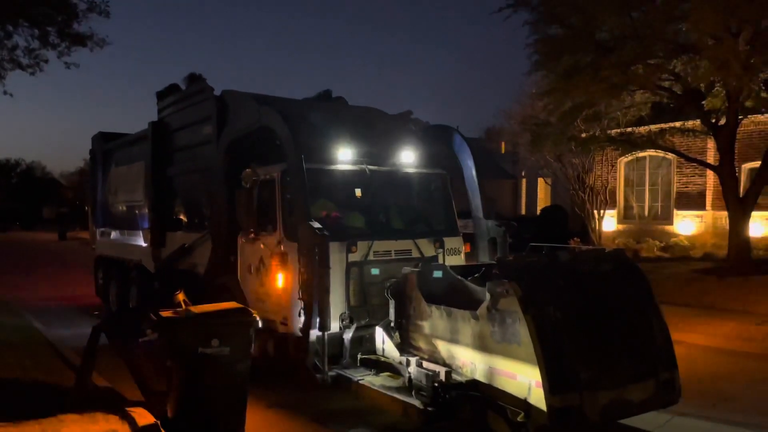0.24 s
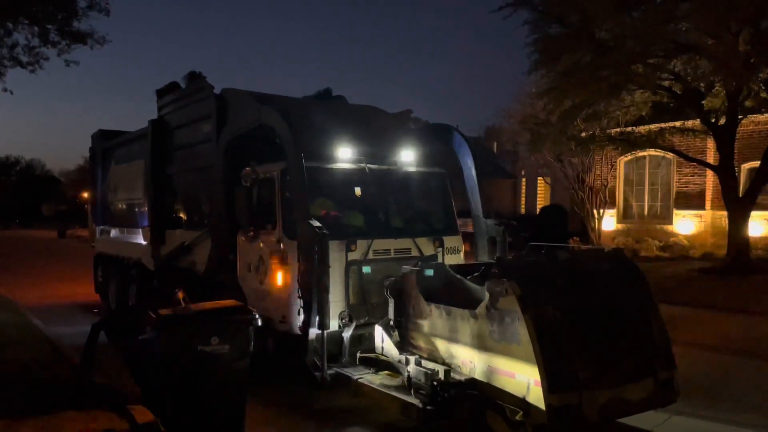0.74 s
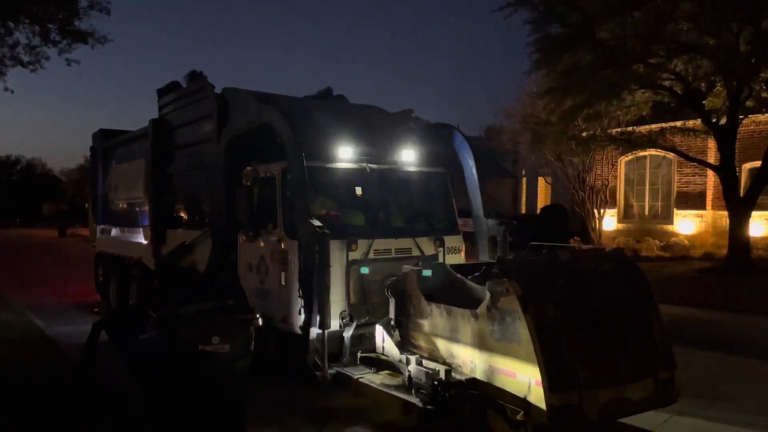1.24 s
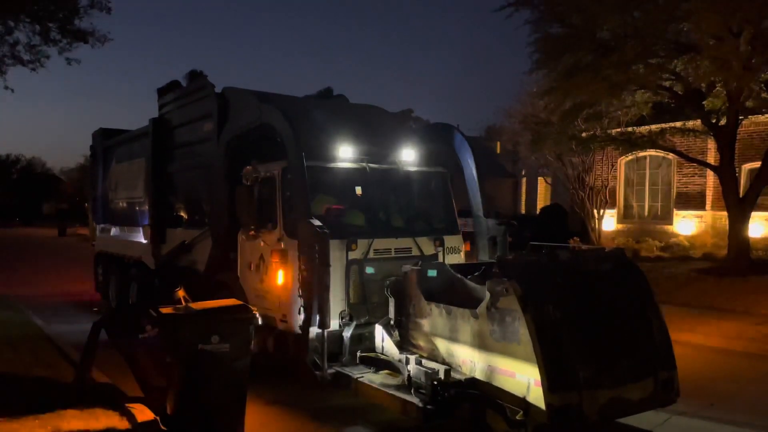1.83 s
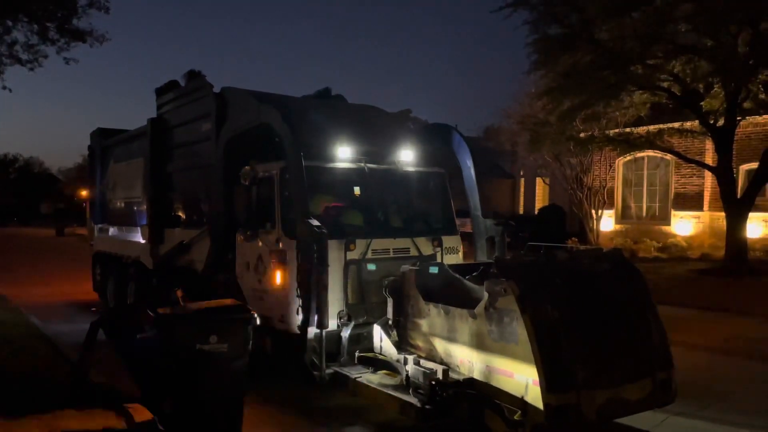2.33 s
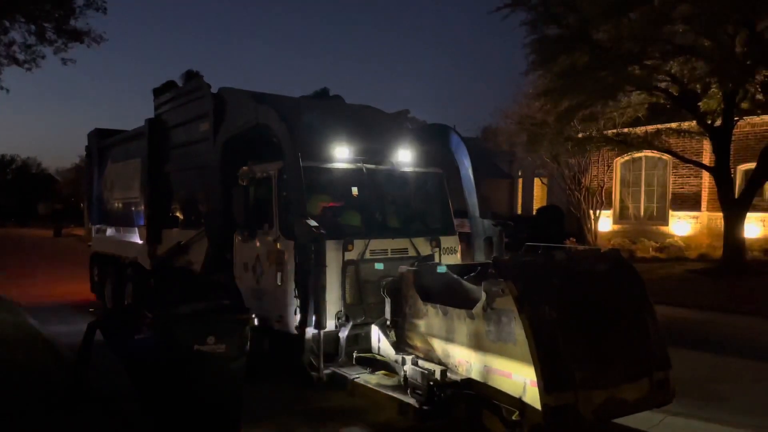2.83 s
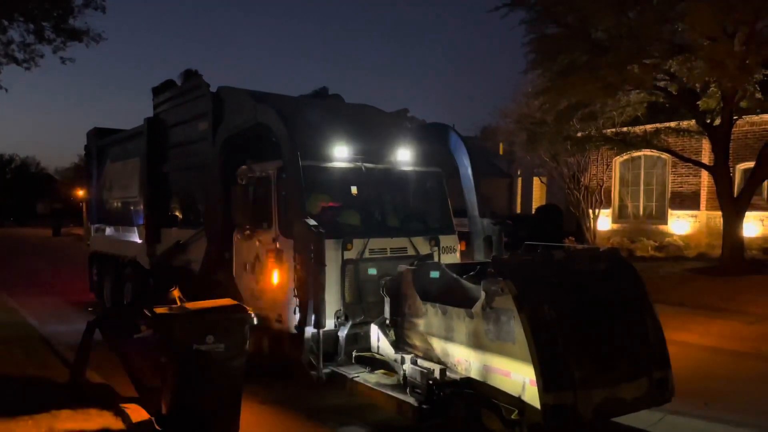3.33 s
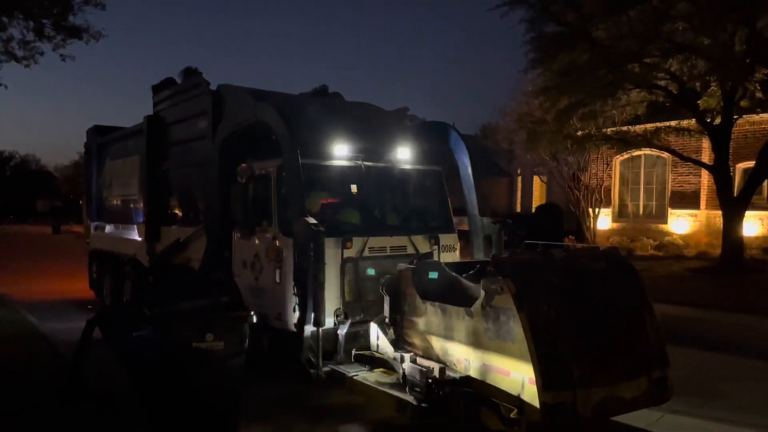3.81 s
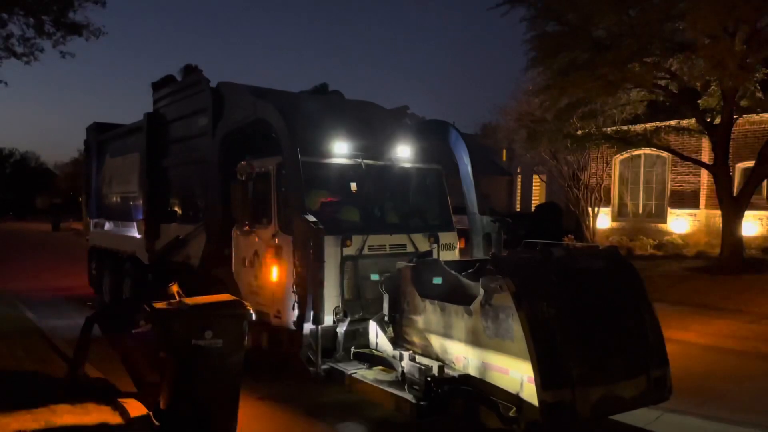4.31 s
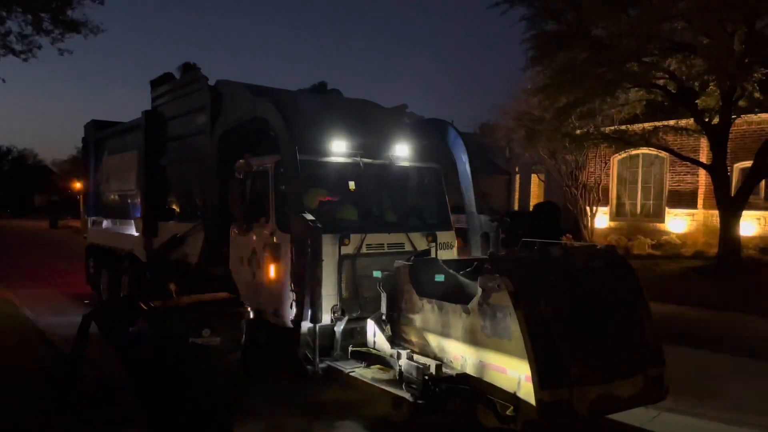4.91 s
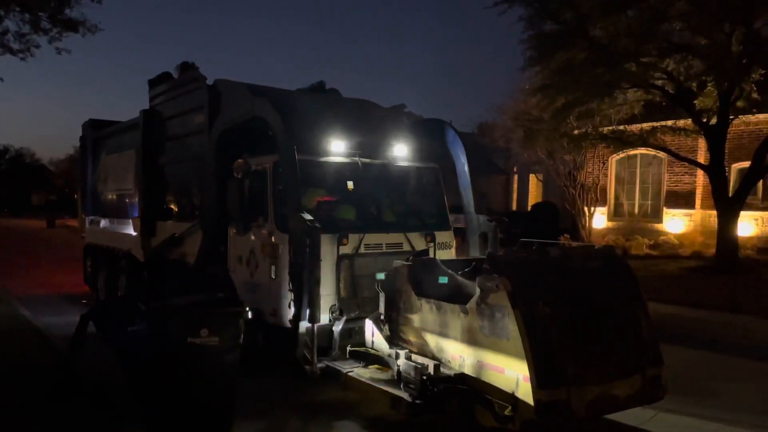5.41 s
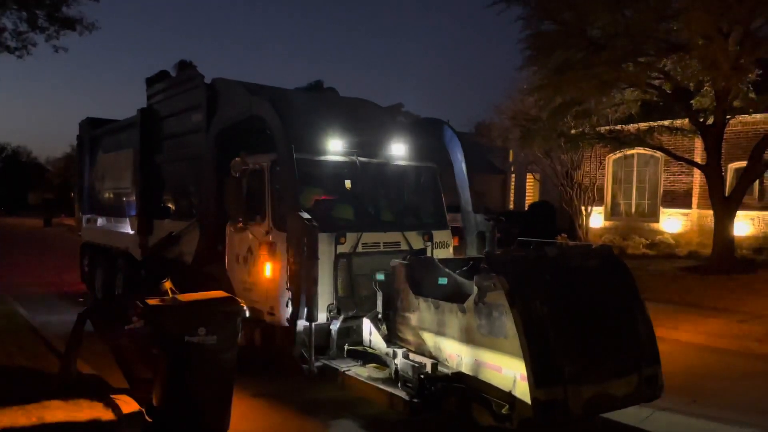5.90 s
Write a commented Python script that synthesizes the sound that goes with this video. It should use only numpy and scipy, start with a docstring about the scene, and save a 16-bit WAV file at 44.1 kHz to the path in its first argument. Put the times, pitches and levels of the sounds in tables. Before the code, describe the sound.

Outdoors on a quiet street, a phone close to a garbage truck hears its diesel throbbing and knocking at fast idle, with pump, gear and alternator whines. A hydraulic valve starts hissing near one second. Soon after, the cooling fan clutch grabs with a low rumble; the engine sags, and the fan swoops up to a loud, droning, rushing roar that continues to the end.

```python
"""A garbage truck's six-cylinder diesel stands at fast idle: firing tones throb, and knocks shape coloured noise.
A pump, gears and an alternator whine as tones tied to the engine speed. At 0.9 s a valve opens: hissing noise.
At 1.7 s the clutch of the cooling fan grabs, a rumble shakes the frame and the engine sags under the load.
The fan swoops up, drones as a tone and roars as noise to the end, while sheet metal rings round it.
A phone hears it all in stereo."""
import sys
import numpy as np
from scipy import signal
from scipy.fft import rfft, irfft
from scipy.io import wavfile
from scipy.ndimage import map_coordinates

SR = 44100
rng = np.random.default_rng(int(sys.argv[2]) if len(sys.argv) > 2 else 0)


def digitize_waveform(pressure):
    """Quantize a signal to 16-bit integers and store it at the path in sys.argv[1].

    Rows of a 2-D input are taken as channels; values are limited to [-1, 1].
    """
    field = np.atleast_2d(pressure).T
    bounded = np.clip(field, -1, 1)
    quanta = np.round(bounded * 32767).astype(np.int16)
    wavfile.write(sys.argv[1], SR, quanta)


N = 271215  # length in samples
IDLE_HZ = 67.5  # firings per second at fast idle


def undb(db):
    """Turn decibels into gain."""
    return 10 ** (np.asarray(db) / 20)


def left_right(pan_db):
    """Share a level difference (left minus right, dB) between the two channels, as dB."""
    return np.array([[pan_db], [-pan_db]]) / 2


def curve(table):
    """Join the (seconds, value) rows of a table by straight lines, at every sample."""
    return np.interp(np.arange(N) / SR, *np.transpose(table))


def spectrum(points):
    """Join (Hz, value) rows on a log-frequency axis, at every frequency bin."""
    hz, value = np.transpose(points)
    bin_hz = np.arange(N // 2 + 1) * SR / N
    return np.interp(np.log(bin_hz + 1), np.log(hz), value)


def walk(rate):
    """Wander slowly and smoothly by chance, with a spread of about 1; rate is fresh levels per second."""
    fresh = rng.standard_normal(int(rate * N / SR) + 3)
    levels = signal.resample_poly(fresh, 4, 1)
    return np.interp(np.arange(N) * 4 * rate / SR, np.arange(len(levels)), levels)


def noise():
    """Make two unrelated white noises."""
    return rng.standard_normal((2, N))


def since(start_s):
    """Seconds passed since a moment, zero before it."""
    return np.maximum(np.arange(N) / SR - start_s, 0)


def resonance(white, hz, width_hz):
    """Ring a white noise in one resonance and bring it to an rms of 1."""
    edges_hz = [hz - width_hz / 2, hz + width_hz / 2]
    rung = signal.sosfilt(signal.butter(2, edges_hz, "band", fs=SR, output="sos"), white)
    return rung / rung.std()


def radiate(pair, colour):
    """Colour two white signals and spread them over the phone's two ports: alike in the bass, unevenly above."""
    # How alike the ports hear the sound. Each row: frequency in Hz, likeness from 0 to 1.
    likeness = [(60, .99), (200, .99), (420, .93), (520, .65), (720, .93), (950, .85), (1180, .25),
                (1350, .78), (1600, .2), (1900, .3), (2080, .7), (2330, .2), (2500, .5), (2800, .4),
                (3250, .72), (4200, .3), (6000, .15), (8500, .25), (10000, .6), (13000, .9)]
    # Which port is louder. Each row: frequency in Hz, left minus right in dB.
    balance_db = [(250, 1.3), (420, -1), (570, 11), (820, 1), (1000, 2), (1270, 12), (1700, 1),
                  (2300, -5.5), (2750, 3), (3600, 7), (5200, 0), (6000, 12), (8100, 5.5), (9000, 0.2)]
    # The two ports hear each frequency at a different phase.
    # Each row: frequency in Hz, lead of the left in radians.
    port_phase = [(60, .05), (200, .22), (400, .75), (520, 1.3), (620, .1), (820, .3), (1000, 1.6),
                  (1250, 5), (1500, 7), (1700, 9.4), (2050, 12.3), (2550, 12.1), (3000, 14.2), (3500, 15.2),
                  (4400, 13.6), (5500, 12.5), (7200, 12.5), (9300, 9.4), (12500, 6.3)]
    # Treble response of the ports. Each row: frequency in Hz, level in dB.
    port_colour = [(4800, -0.5), (5600, -2.5), (5950, 6.5), (6700, 3.5), (7400, -5.5), (8400, 2),
                   (9400, -6), (10500, 2.5), (12500, 1.5), (13500, -7.5), (15500, -13)]
    alike = np.clip(spectrum(likeness), -1, 1)
    mid, side = rfft(pair) * np.sqrt(np.array([1 + alike, 1 - alike]) / 2)
    lean = undb(spectrum(balance_db))
    late = np.exp(-1j * spectrum(port_phase))
    ports = np.array([(mid + side) * lean, (mid - side) * late])
    ports = ports * np.sqrt(2 / (1 + lean ** 2))  # the lean leaves the total power as it was
    gain = undb(spectrum(colour) + spectrum(port_colour))
    return irfft(ports * gain * np.sqrt(SR / 2), N)  # colour is in dB per Hz


def panel_ring(tone_hz):
    """Decibels that ringing panels add to a tone as it nears their resonances."""
    # Panels. Each row: resonance in Hz, width in Hz, boost at the resonance in dB.
    panels = [(252, 22, 8), (941, 32, 13), (1522, 48, 10.5), (1795, 70, 7)]
    return sum(db / (1 + (2 * (tone_hz - hz) / width_hz) ** 2) for hz, width_hz, db in panels)


def exhaust(firings, firing_hz, fan_load, waver_db=0.9):
    """The firing boom and its overtones; a neighbour a sixth higher makes it throb once every engine cycle."""
    # Exhaust note. Each row: multiple of the firing rate, level in dB before the drive below is added.
    exhaust_orders = [(1, 0), (7 / 6, -8), (9 / 6, -21), (10 / 6, -16), (2, -7.5), (14 / 6, -23),
                      (15 / 6, -21), (3, -19), (25 / 6, -22), (31 / 6, -20)]
    # Drive of the boom as it swells and dips. Each row: time in seconds, level in dB.
    boom_table = [(0, -27), (.6, -30.5), (1.1, -27.5), (1.45, -22.5), (1.6, -23.5), (1.72, -29.5),
                  (1.9, -25), (1.98, -31), (2.22, -33), (2.35, -27), (2.65, -22), (3.4, -23.5),
                  (3.8, -25.5), (4.5, -24), (4.9, -25), (5.4, -23.5), (6.15, -23.5)]
    # The throb: level at idle, change as speed rises (fades out under the fan), change at full fan load.
    lope_idle_db, lope_db_per_hz, lope_load_db = -31.5, -4, -4
    overtone_db = -31.5
    boom_db = curve(boom_table)
    above_idle_hz = firing_hz - IDLE_HZ
    lope_db = lope_idle_db + lope_db_per_hz * above_idle_hz * (1 - fan_load) + lope_load_db * fan_load
    out = 0
    for order, db in exhaust_orders:
        if order == 1:
            drive_db = boom_db
        elif order % 1:  # tones between whole multiples come from unequal cylinders
            drive_db = lope_db
        else:
            drive_db = overtone_db
        tone = np.cos(2 * np.pi * order * firings)
        out = out + tone * undb(db + drive_db + waver_db * walk(9))
    return np.sqrt(2) * out


def clatter(firings, firing_hz, fan_load, speed_db_per_hz=0.5, lug_db_per_hz=1.0, repeat=0.62,
            repeat_top_hz=1900, knock_depth=0.18, knock_decay=0.37, waver_db=0.5):
    """Each cylinder knocks in its own way, cycle after cycle; the treble of each knock is new."""
    # Clatter of the engine block, before wavering. Each row: frequency in Hz, level at idle speed in dB per Hz.
    block = [(25, -54), (50, -56.5), (120, -56.5), (180, -62.5), (300, -58), (430, -64.5), (620, -62),
             (740, -59.5), (950, -58.5), (1130, -64.5), (1400, -62.5), (1550, -63.5), (1680, -68.5),
             (2050, -67.5), (2500, -73.5), (3200, -70), (5300, -84.5), (12500, -93.5)]
    # Knock of each cylinder in firing order, in dB.
    cylinder_db = [6, 4, 2.5, -8, 1, -2]
    # One random pattern per channel, read again every six firings.
    size = 4096
    place = firings / 6 % 1 * size
    patterns = rng.standard_normal((2, size))
    cycle = np.array([map_coordinates(p, [place], order=3, mode="grid-wrap") for p in patterns])
    # The repeating share of the power shrinks towards the treble, and fresh noise fills the rest.
    bin_hz = np.arange(N // 2 + 1) * SR / N
    share = np.clip(repeat, 0, 1) / (1 + (bin_hz / repeat_top_hz) ** 4)
    grit = irfft(rfft(cycle) * np.sqrt(share) + rfft(noise()) * np.sqrt(1 - share), N)
    # Each knock dies away over a share of the time between firings.
    strength = undb(cylinder_db)[firings.astype(int) % 6]
    gate = 1 + knock_depth * strength * np.exp(-(firings % 1) / knock_decay)
    gate = gate / np.sqrt(np.mean(gate ** 2))
    # Without the fan it grows with speed; loaded, it knocks harder as the engine is dragged down.
    db = (speed_db_per_hz - lug_db_per_hz * fan_load) * (firing_hz - IDLE_HZ) + waver_db * walk(14)
    return radiate(grit * gate * undb(db), block)


def clutch():
    """Share of full fan speed: the fan freewheels until the clutch grabs, then spins up gently at first."""
    freewheel_share, grabs_s, spin_up_s = .25, 1.685, .115
    return 1 - (1 - freewheel_share) * np.exp(-(since(grabs_s) / spin_up_s) ** 2)


def fan(firing_hz, speed, waver_db=0.2, waver_rad=0.072, chop=0.061, buffet_db=0.57, drone_power=1.0,
        roar_power=1.82, rush_from_hz=320, rush_power=1.2):
    """Blades pass the shroud with a clean drone and chop the air that they tear through the radiator."""
    # Drone before tip speed and panels change it. Each row: time in seconds, level in dB.
    drone_table = [(1.9, -16.5), (2.05, -19.5), (2.35, -16), (3.15, -18.5), (3.55, -17.5), (3.9, -17),
                   (4.7, -16), (5, -17), (5.4, -16), (5.7, -15.5), (6.15, -18.5)]
    # Air torn by the fan. Each row: frequency in Hz, level in dB per Hz near full speed.
    roar = [(25, -49), (50, -56), (95, -45), (125, -46), (180, -41), (270, -43.5), (320, -48), (400, -45.5),
            (490, -52.5), (600, -49), (760, -49), (930, -51.5), (1050, -56.5), (1250, -57), (1360, -55),
            (1750, -66.5), (2100, -67.5), (2700, -70.5), (3400, -65), (3950, -71.5), (4800, -83),
            (12500, -93.5)]
    # The drone sets in above a share of full speed, over a further share, and so is heard swooping up.
    drone_from_share, drone_onset_share = .62, .35
    blades_per_firing = 3.046  # blade passes per firing at full fan speed
    blade_hz = blades_per_firing * firing_hz * speed
    blade = 2 * np.pi * np.cumsum(blade_hz) / SR
    drone_db = curve(drone_table) + panel_ring(blade_hz) + waver_db * walk(21)
    drone = np.sqrt(2) * np.sin(blade + waver_rad * walk(21.94)) * undb(drone_db)
    air = noise() * (1 + chop * np.cos(blade)) * undb(buffet_db * walk(60))
    # Drone and roar both grow with tip speed.
    tip_speed = speed * firing_hz / firing_hz.mean()
    onset = np.clip((speed - drone_from_share) / drone_onset_share, 0, 1)
    drone = drone * onset * tip_speed ** drone_power * undb(left_right(1) * 1.0)
    # The rumble builds first; the rush above it needs nearly full speed.
    rumble = signal.sosfiltfilt(signal.butter(2, rush_from_hz, fs=SR, output="sos"), air)
    air = rumble + (air - rumble) * speed ** rush_power
    return drone + radiate(air * tip_speed ** roar_power, roar)


def shroud(fan_load, firing_hz, lug_db_per_hz=1.5):
    """The draught rings the sheet metal round the fan, harder while the engine labours."""
    # Metal. Each row: resonance in Hz, width in Hz, level in dB at full fan load and idle speed,
    # left minus right in dB.
    sheets = [(759, 30, -37, 0), (1350, 58, -41.5, 9.5)]
    drive = fan_load * undb(lug_db_per_hz * (IDLE_HZ - firing_hz))
    out = 0
    for hz, width_hz, db, pan_db in sheets:
        ring = resonance(rng.standard_normal(N), hz, width_hz)
        out = out + ring * undb(db + left_right(pan_db))
    return out * drive


def jolt(hz=125, width_hz=70, level_db=-21, attack_s=0.022, decay_s=0.14):
    """The grabbing clutch shakes the frame: a low rumble that starts fast and dies away."""
    after_s = since(1.775)
    rumble = resonance(rng.standard_normal(N), hz, width_hz) * undb(level_db)
    return rumble * np.minimum(after_s / attack_s, 1) * np.exp(-after_s / decay_s)


def whine(firings, firing_hz, fan_load, flutter_db=0.35, flutter_rad=0.075):
    """Hydraulic pump and timing gears sing at fixed multiples of the firing rate; higher tones flutter more."""
    # Pitch of each tone, as a multiple of the firing rate.
    orders = [3.76, 7, 10.5, 14, 26.34]
    # Base levels, one row per tone. Each row: dB without fan load, dB at full fan load, left minus right in dB.
    levels_db = [(-39, -52, 2.9), (-51.5, -57, 19), (-44, -42, 2.6), (-53, -50, 2.4), (-54.5, -57.5, 19.2)]
    # How the lowest tone, the highest tone and the others swell and fade. Each row: time in seconds, change in dB.
    pump_swell = [(0, -1), (1.2, -1), (1.42, 2.5), (1.56, 2), (1.62, -8), (1.7, 1), (1.8, 0)]  # the hum dips briefly before the fan comes in
    gear_swell = [(0, 3.5), (.22, 6), (.35, -4), (.53, 4), (.72, -2), (.85, -5), (1.03, 3), (1.22, 1),
                  (1.29, -7), (1.38, 3), (1.52, 2), (1.6, -2), (1.7, 3.5), (1.81, -1), (1.9, -3), (2.3, 6),
                  (2.5, 7), (2.73, -1), (3, 5), (3.3, -6), (3.7, 5), (4, -6), (6.15, 0)]
    steady = [(0, 0)]
    swells = [pump_swell, steady, steady, steady, gear_swell]
    out = 0
    for order, (free_db, loaded_db, pan_db), swell in zip(orders, levels_db, swells):
        db = free_db + (loaded_db - free_db) * fan_load + panel_ring(order * firing_hz)
        db = db + curve(swell) + flutter_db * np.sqrt(order) * walk(35)
        tone = np.sin(2 * np.pi * order * firings + flutter_rad * np.sqrt(order) * walk(27))
        out = out + np.sqrt(2) * tone * undb(db + left_right(pan_db))
    return out


def alternator(firing_hz, fan_load, base_db=-48.5, flutter_db=2.5, flutter_rad=0.4):
    """A thin belt-driven whine that droops in pitch as the fan loads the belt, and sinks away."""
    # How the whine swells and fades. Each row: time in seconds, change in dB.
    swell = [(0, 2), (.17, -0.5), (.4, -7), (.62, -4.5), (.8, 3.5), (.97, 0), (1.12, -4), (1.28, 0),
             (1.45, -13), (1.66, 1), (1.82, 1), (1.9, 6), (2.05, -12)]
    order = 22.62  # multiple of the firing rate without slip
    belt_slip = 0.027  # share of speed that the belt loses at full fan load
    hz = order * firing_hz * (1 - belt_slip * fan_load)
    tone = np.sqrt(2) * np.sin(2 * np.pi * np.cumsum(hz) / SR + flutter_rad * walk(45))
    return tone * undb(base_db + panel_ring(hz) + curve(swell) + flutter_db * walk(39.8))


def valve(opening_s=0.023, spurt_db=4, spurt_s=0.53, sputter_db=1.4):
    """A hydraulic valve snaps open: oil spurts through, then settles to a slightly uneven hiss."""
    # Oil through the valve. Each row: frequency in Hz, settled level in dB per Hz.
    hiss = [(1500, -116), (3000, -74.5), (4500, -87.5), (5500, -88.5), (6100, -89), (7400, -86.5),
            (8400, -89), (12000, -95)]
    after_s = since(0.92)
    db = spurt_db * np.exp(-after_s / spurt_s) + sputter_db * walk(21)
    return radiate(noise() * np.minimum(after_s / opening_s, 1) * undb(db), hiss)


def scene():
    """One engine speed drives the exhaust, clatter, whines and fan; the valve and the jolt are added."""
    # Engine speed, which sags when the fan grabs and then recovers.
    # Each row: time in seconds, firing rate in Hz.
    engine_speed = [(0.0, 67.79), (0.45, 67.4), (0.85, 66.77), (1.25, 67.7), (1.62, 69.59), (1.72, 68.27),
                    (1.98, 65.01), (2.22, 65.6), (2.75, 68.36), (3.15, 68.41), (3.85, 67.61), (4.7, 66.46),
                    (5.45, 67.24), (6.15, 66.7)]
    throb_delay_s = .04  # shifts where in the engine cycle the sound starts
    firing_hz = curve(engine_speed)
    firings = np.cumsum(firing_hz) / SR - throb_delay_s * IDLE_HZ  # running count of firings
    speed = clutch()
    fan_load = speed ** 3
    engine = exhaust(firings, firing_hz, fan_load) + clatter(firings, firing_hz, fan_load)
    cooling = fan(firing_hz, speed) + shroud(fan_load, firing_hz) + jolt()
    whines = whine(firings, firing_hz, fan_load) + alternator(firing_hz, fan_load)
    return engine + cooling + whines + valve()


def record(dry):
    """A 60-sample fade-in gives a clean start; the phone cuts the deep bass and the top."""
    low_cut_hz, top_hz = 50, 15500
    fade = np.minimum(np.arange(N) / 60, 1)
    thinned = signal.sosfilt(signal.butter(4, low_cut_hz, "high", fs=SR, output="sos"), dry * fade)
    return signal.sosfilt(signal.ellip(8, .2, 70, top_hz, fs=SR, output="sos"), thinned)


dry = scene()
out = record(dry)
digitize_waveform(out)
```